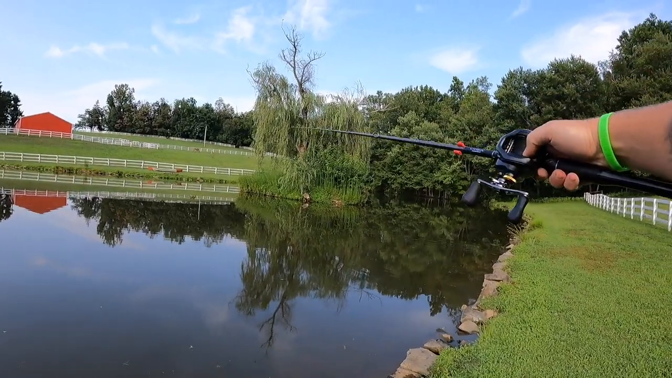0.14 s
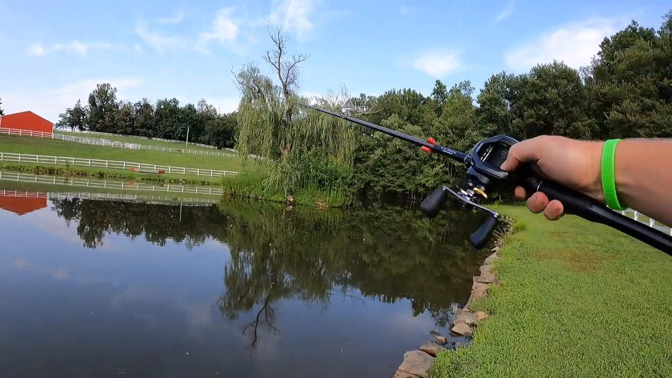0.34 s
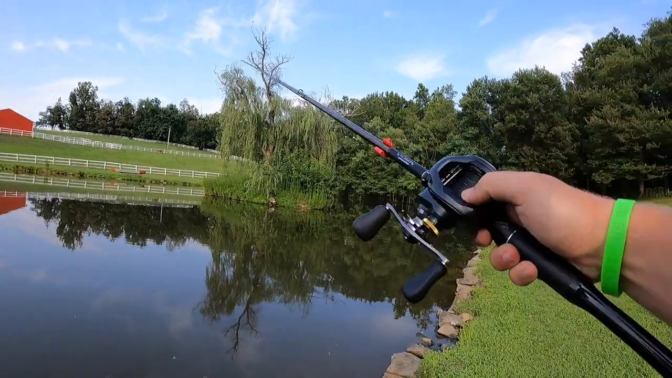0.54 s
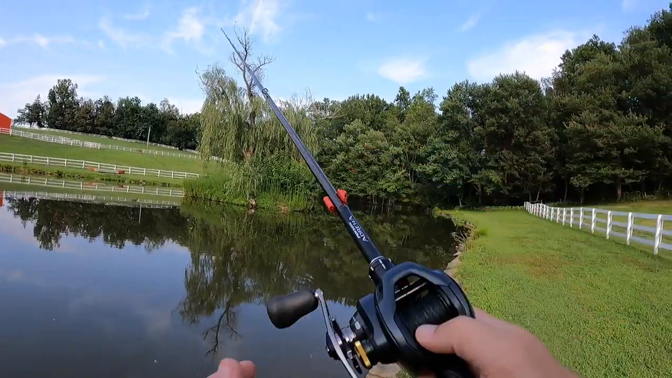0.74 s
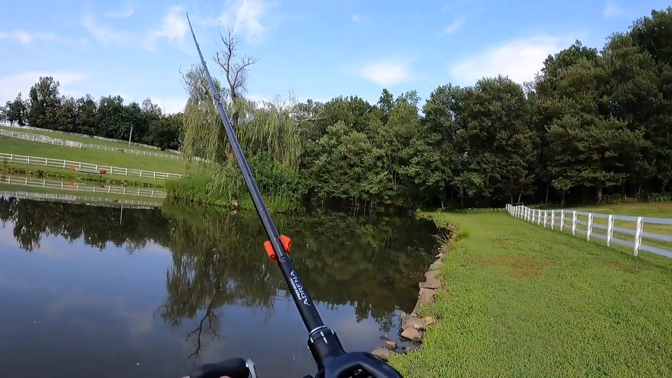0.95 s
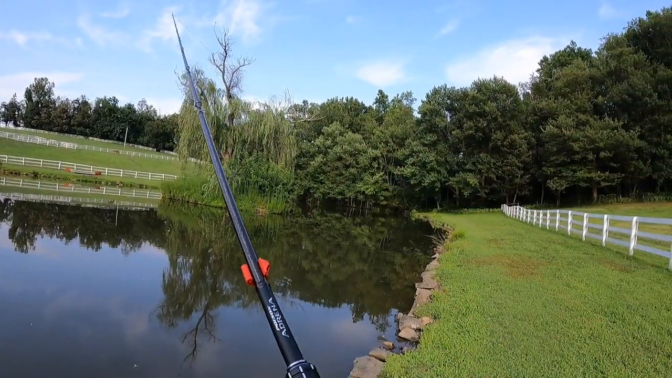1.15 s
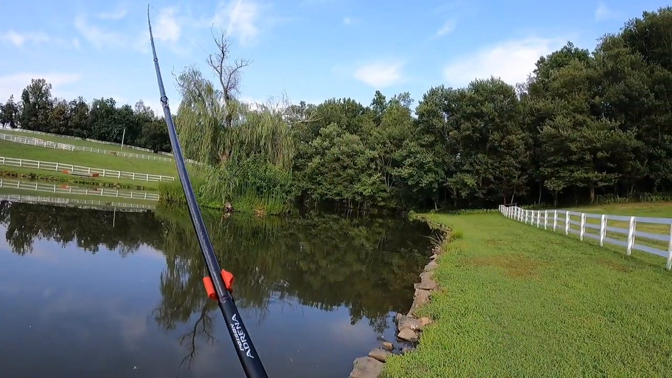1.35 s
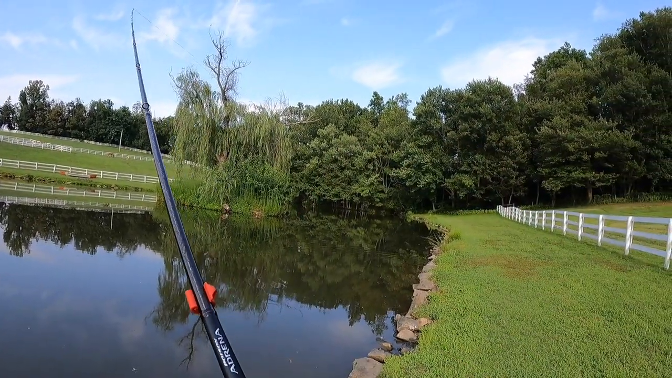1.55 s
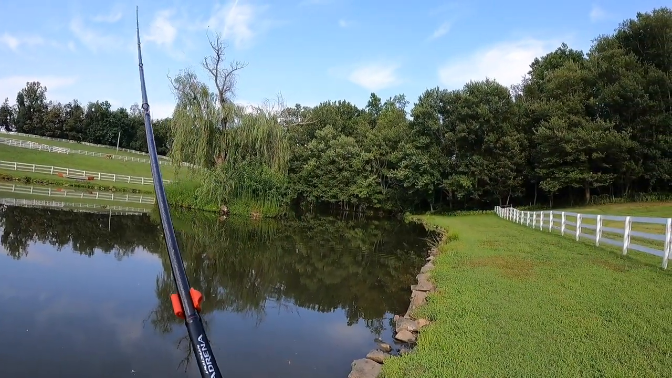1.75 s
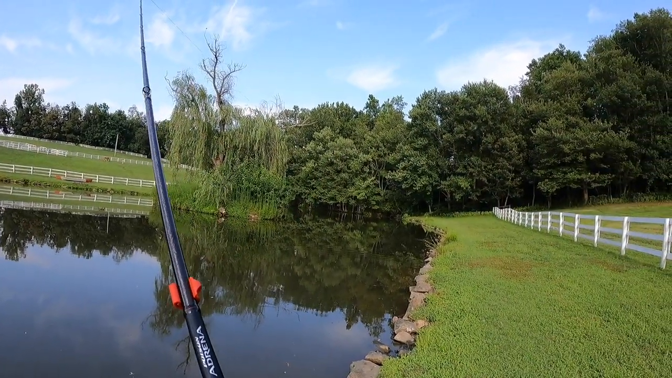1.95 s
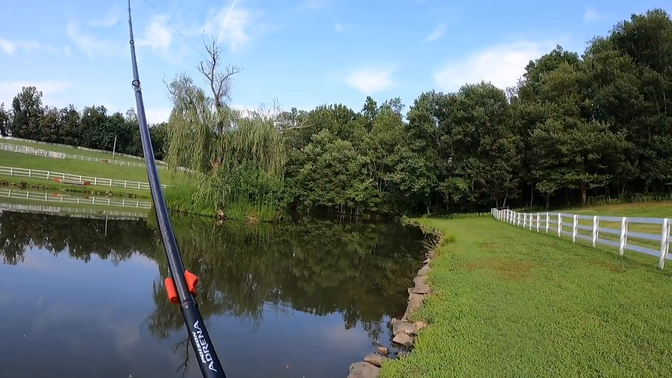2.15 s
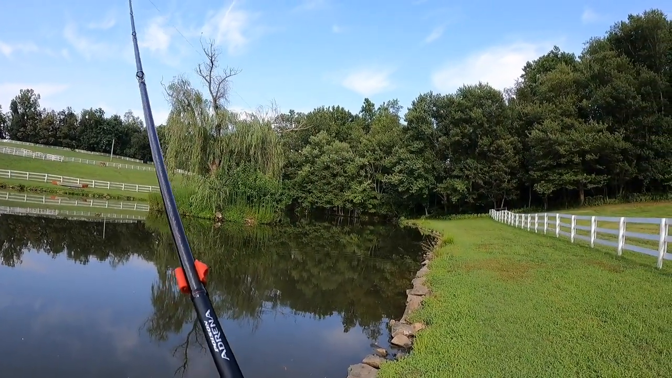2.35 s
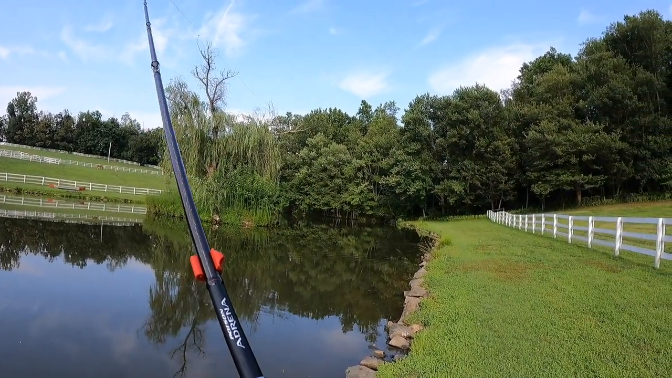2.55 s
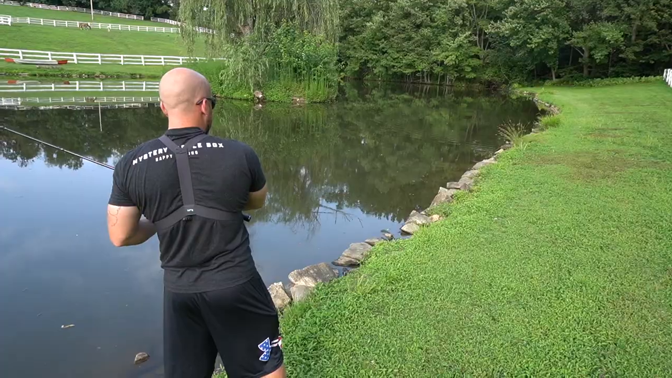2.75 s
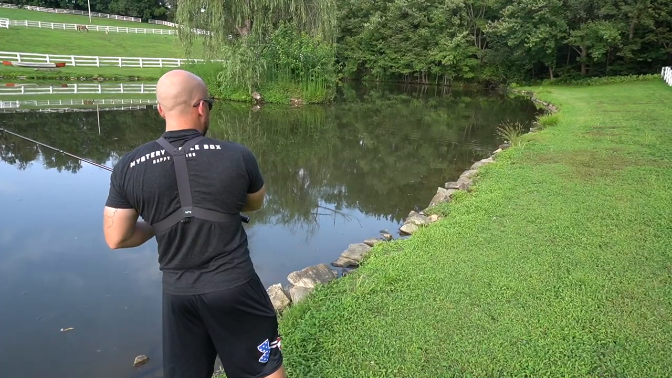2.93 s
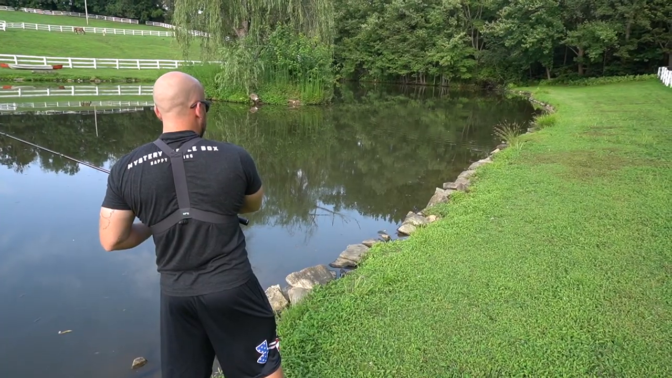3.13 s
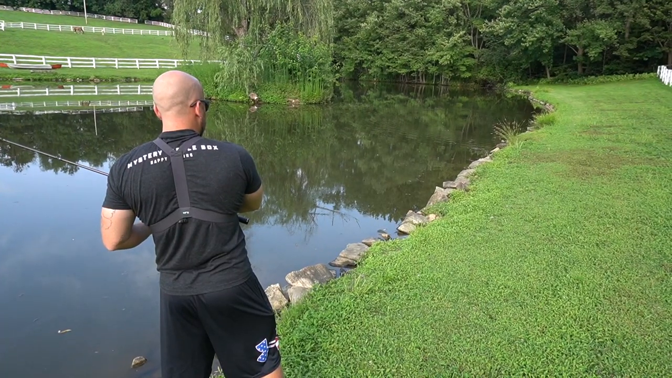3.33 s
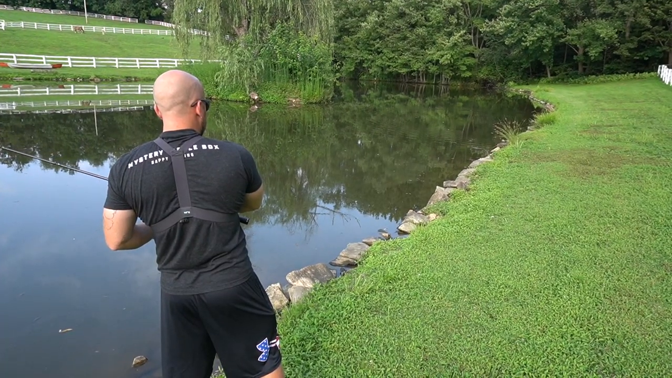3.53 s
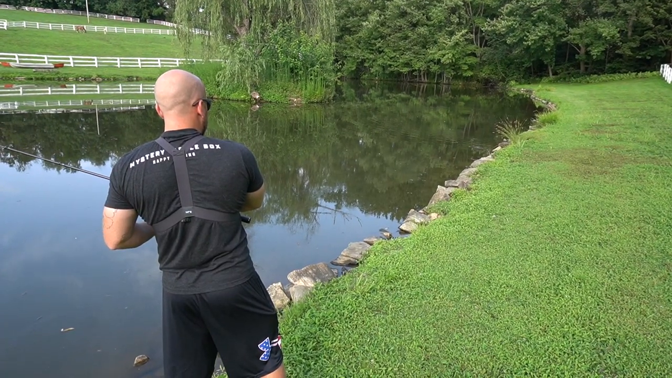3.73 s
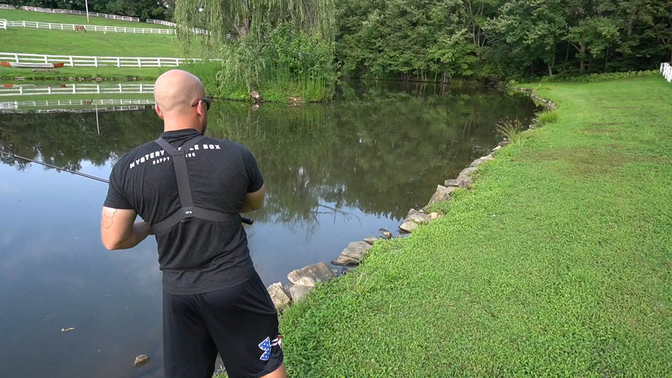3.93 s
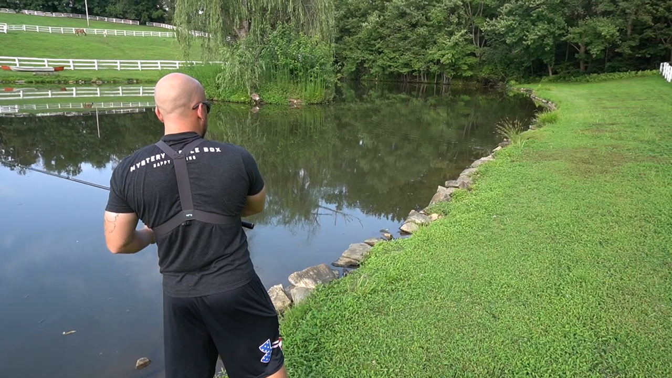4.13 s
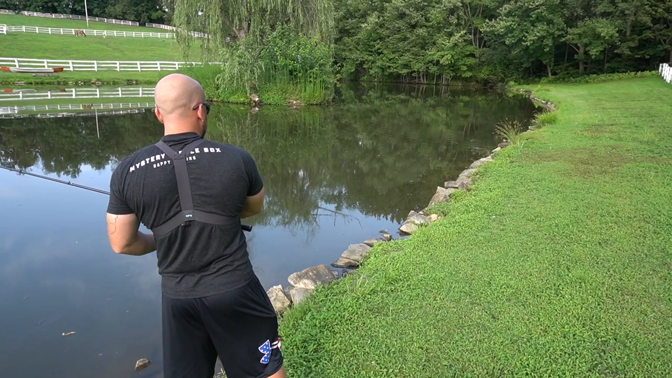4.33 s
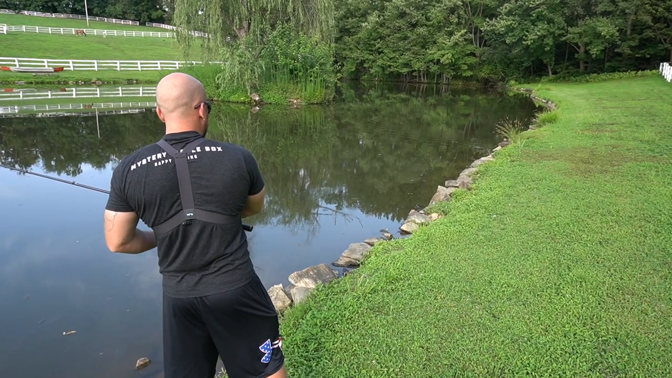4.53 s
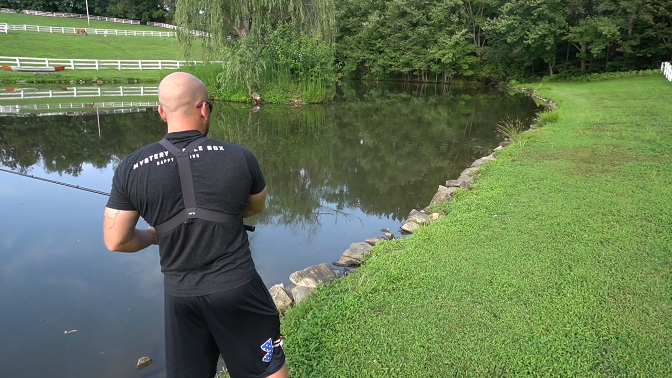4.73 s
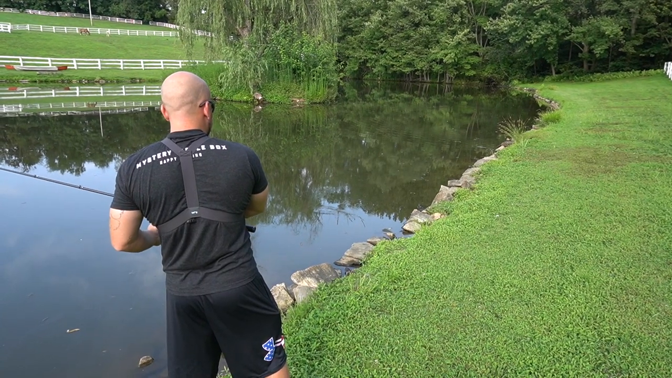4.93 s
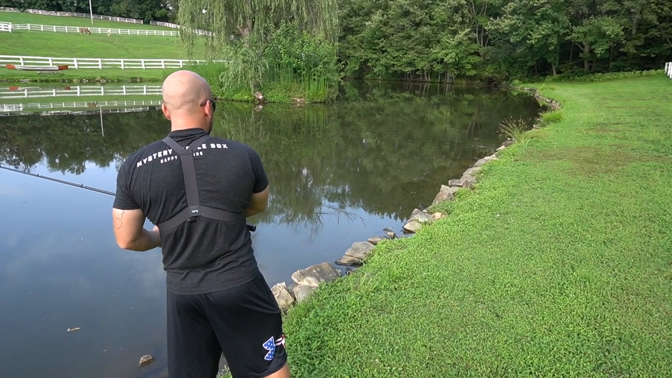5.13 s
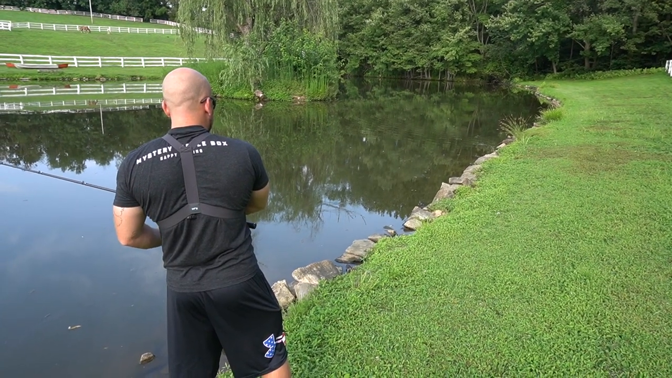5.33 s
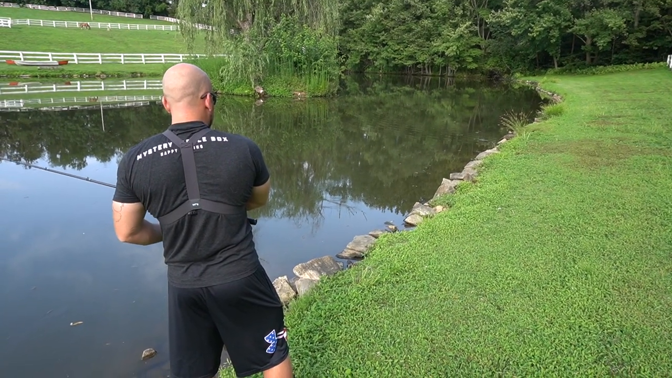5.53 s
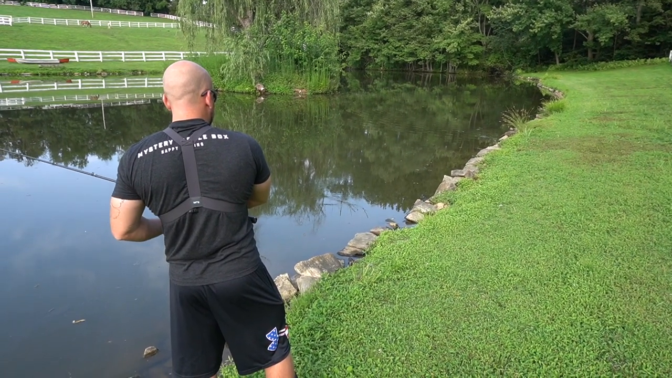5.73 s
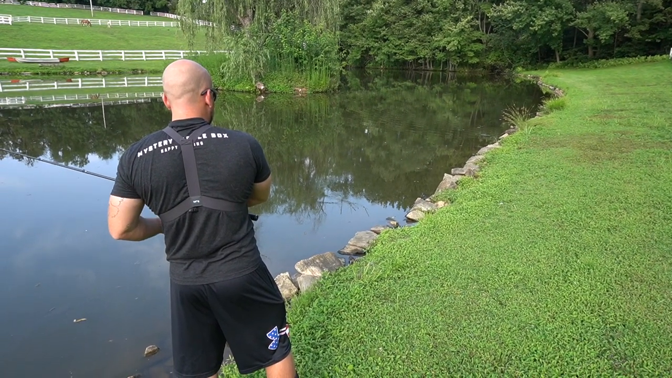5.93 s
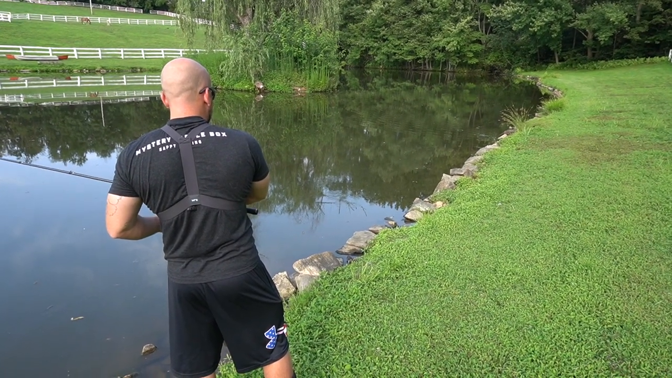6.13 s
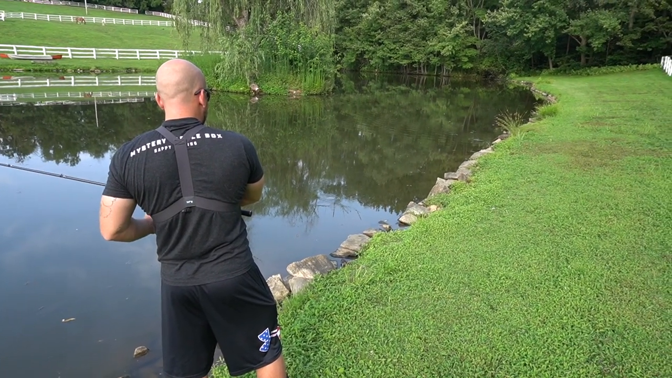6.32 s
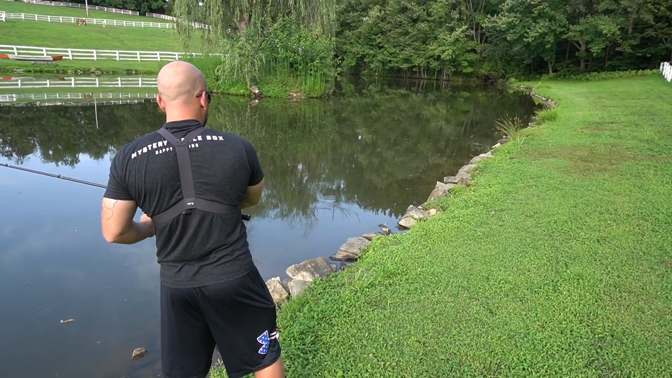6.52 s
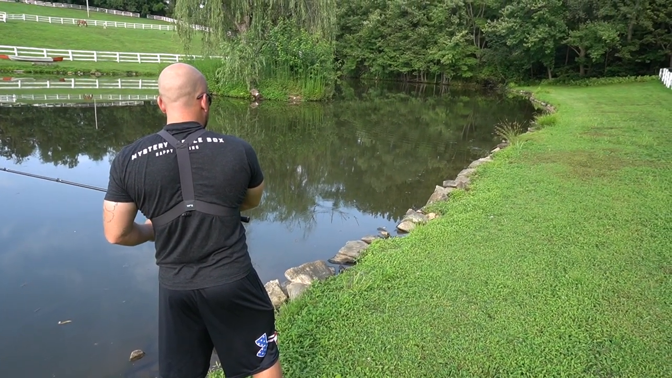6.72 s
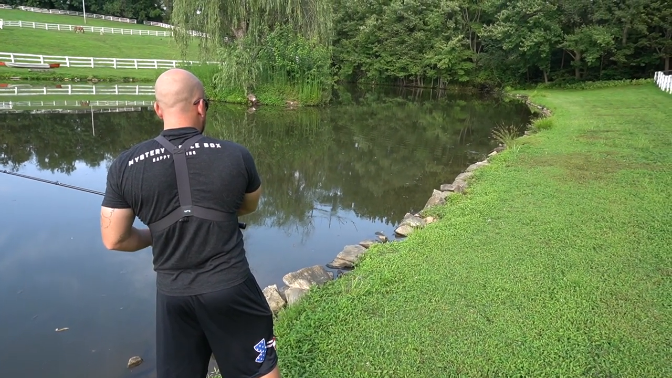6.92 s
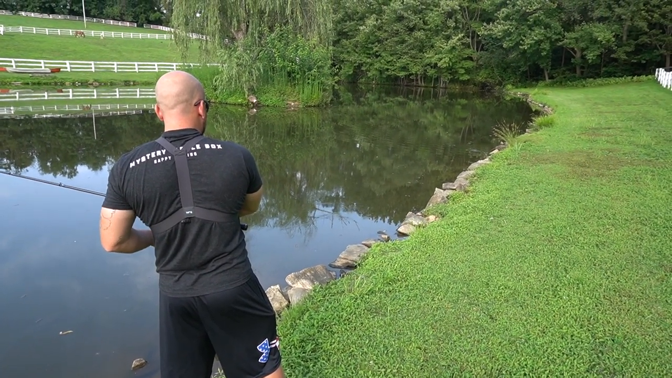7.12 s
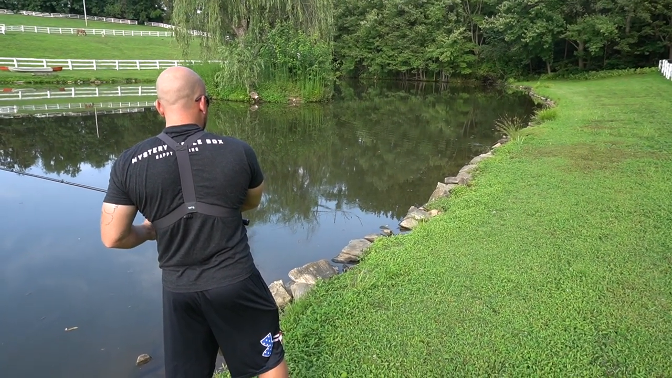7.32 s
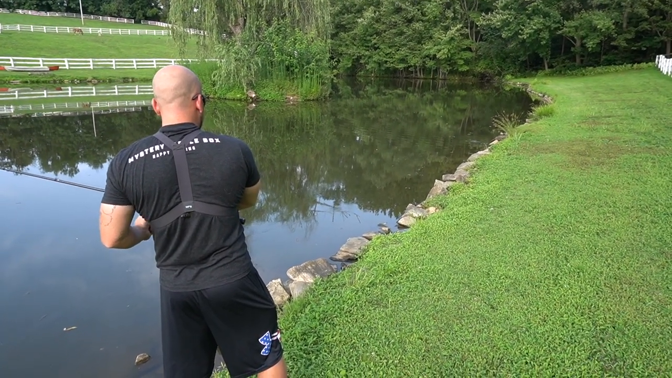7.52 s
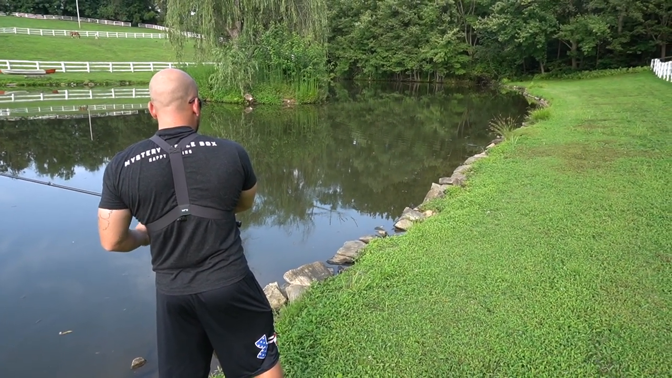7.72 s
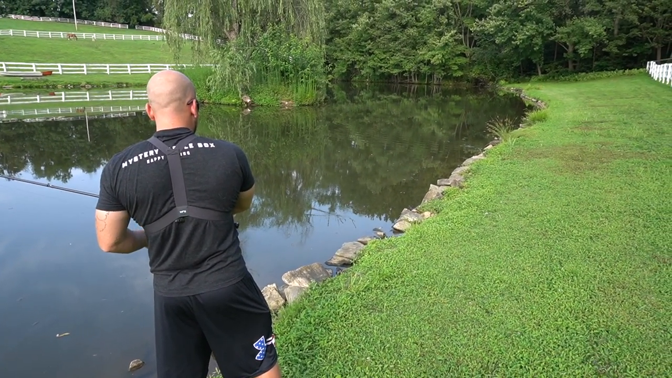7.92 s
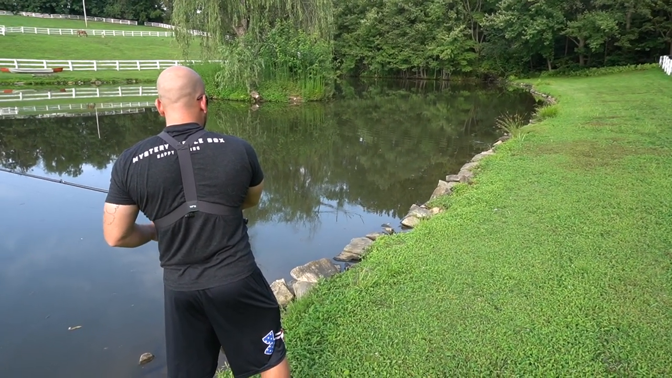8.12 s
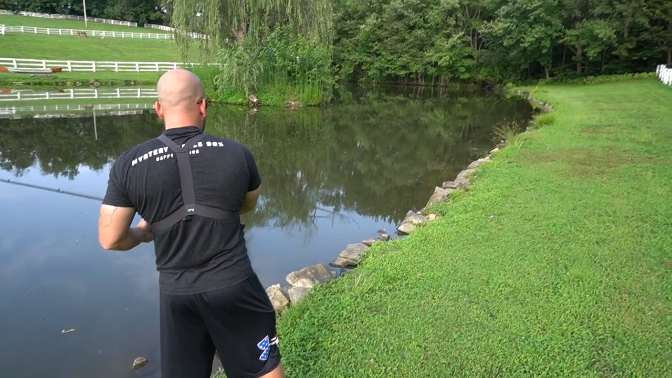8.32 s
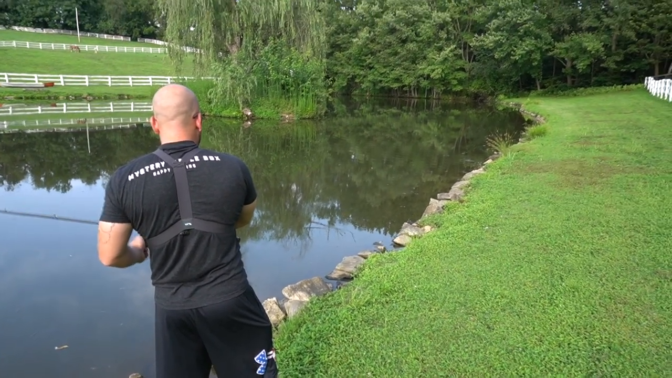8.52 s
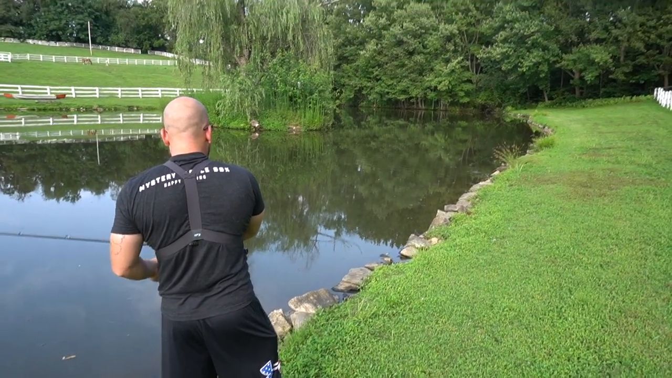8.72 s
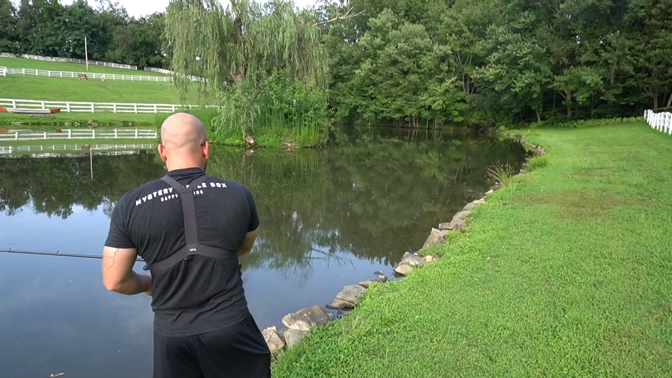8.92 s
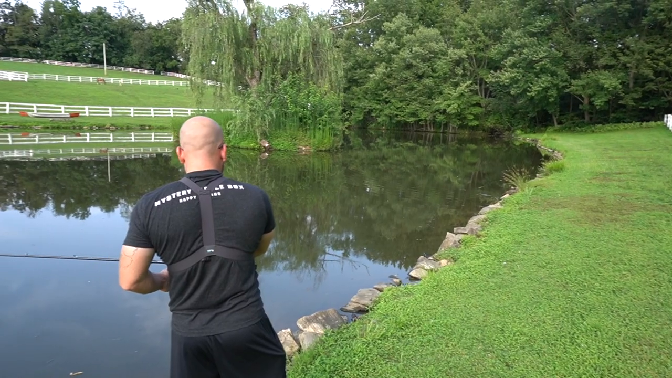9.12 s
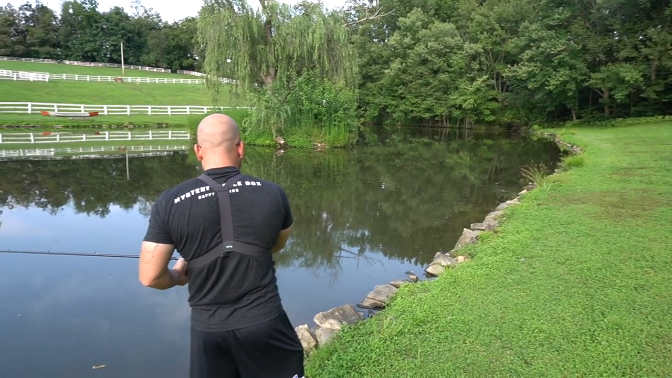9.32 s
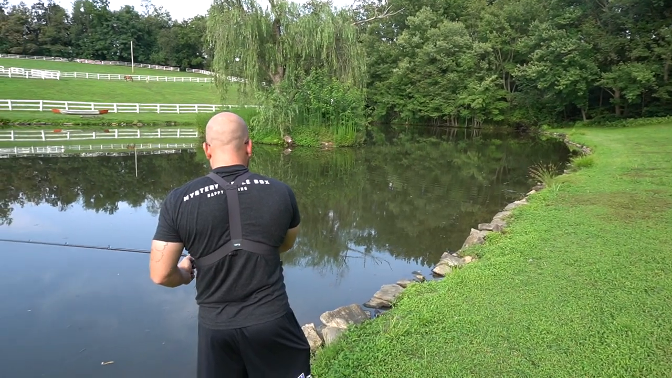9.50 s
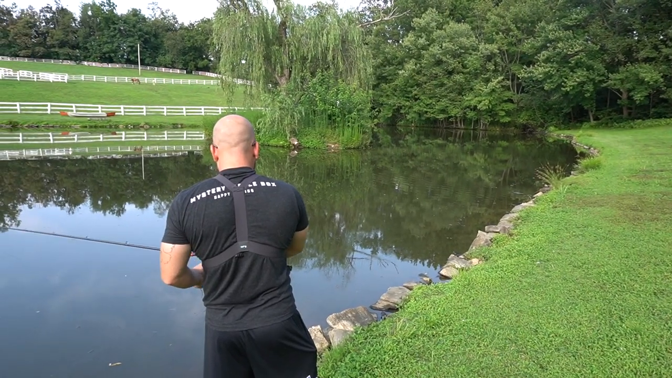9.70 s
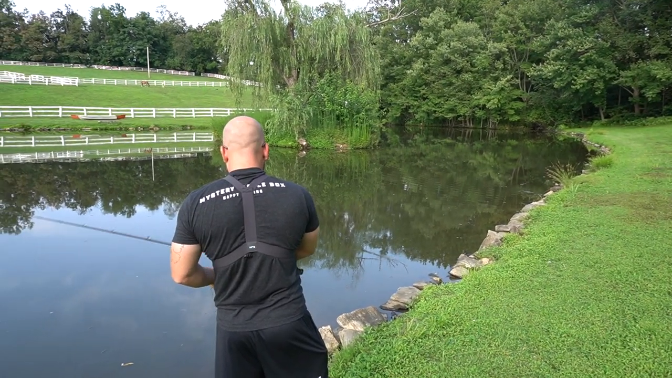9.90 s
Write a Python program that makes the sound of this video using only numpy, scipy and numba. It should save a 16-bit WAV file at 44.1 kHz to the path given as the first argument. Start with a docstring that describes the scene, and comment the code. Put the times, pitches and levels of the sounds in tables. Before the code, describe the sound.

From 0 s, a close reel releases line in a bright hiss with dense patter, and the rod makes a low swish around 0.3 s. From 0.27 s the thumbed spool sings a rough, chattering whistle, slightly right, tumbling from high to low and cutting off near 0.6 s. Distant hoarse caws echo at about 0.45, 0.9 and 1.45 s. A faint tick at 1.0 s and small clicks at 1.3 s precede a very loud, dry gear snap at 1.37 s, with a brief metallic ring; a tiny tick follows at 1.73 s. A nasal bird calls at 2.1 s. Wide rumbling air switches at 2.7 s to calmer, centred air. Until about 10 s, katydids chirp several times a second over fine cricket pulses, faint songbirds whistle from the trees, and a far engine hums. Cloth rustles softly from 9 to 9.7 s.

```python
"""A baitcasting reel beside a pond: from 0 s line noise hisses and patters, the rod swishes (filtered noise),
and from 0.27 s the thumbed spool whistles down as resonant noise; noise cracks and decaying modes snap it into gear.
Crow caws (wandering tone), a nasal call (harmonics), then songbirds (gliding sines) echo from the trees; throughout,
insects buzz as pulsed noise and tones, and a far engine hums in harmonics. At 2.7 s the coloured-noise air passes
from rumbling and wide, as at the angler's chest, to calm and central, as a few steps behind; at 9 s cloth rustles."""
import sys
import numpy as np
from scipy import signal
from scipy.fft import rfft, irfft, next_fast_len
from scipy.io import wavfile
from scipy.ndimage import uniform_filter1d, minimum_filter1d
from numba import njit

SR = 44100
rng = np.random.default_rng(int(sys.argv[2]) if len(sys.argv) > 2 else 0)


def unload_wav(signal):
    """Save mono or channel-first audio to the path in sys.argv[1] as 16-bit WAV at rate SR, clipped to [-1, 1]."""
    wavfile.write(
        sys.argv[1],
        SR,
        np.round(np.clip(np.atleast_2d(signal).T, -1, 1) * 32767).astype(np.int16),
    )


N = 439236
TIME = np.arange(N) / SR
TOP_HZ = 15700

# Spectrum of the line hiss. Each row: frequency in Hz, relative level in dB.
SPOOL_SPECTRUM = [(290, -46), (500, -8.5), (745, -13.5), (871, -2), (1190, -4), (1450, -10.5), (1750, -5),
                  (3610, -4.5), (5700, -4.5), (7160, 1.5), (12100, -15), (14800, -36)]
# Spool spins up, eases, surges again, dies away. Each row: time in seconds, level in dB before unevenness.
SPOOL_LEVEL_DB = [(0.0, -52), (.06, -47), (.3, -45.5), (.37, -50.5), (.46, -47), (.54, -46.5), (.62, -50.5),
                  (1.2, -73)]
# Pitch of the braked spool. Each row: time in seconds, frequency in Hz.
WHISTLE_PITCH_HZ = [(.3, 4980), (0.414, 4570), (.432, 4180), (.52, 4030), (.561, 2424), (0.587, 1490)]
# Blows of clutch, gears and rod butt. Each row: start in seconds, level in dB before the common trims,
# ring against crack in dB before its trim, crack decay in seconds, low edge of the crack in Hz, high edge in Hz.
BLOWS = [(1.0157, -41, 5, 0.0058, 1500, 5000), (1.274, -20, 2, 0.0007, 1100, 7500),
         (1.311, -18, 3, 0.0008, 350, 7500), (1.35, -28.5, -2.5, 0.0037, 1200, 7000),
         (1.3622, -7, -15, 0.00099, 3300, 10000), (1.367, -15.5, -3, 0.0025, 1200, 5000),
         (1.3705, -13, -9.5, 0.0027, 1000, 12000), (1.3738, 4, -0.5, 0.0013, 300, 12000),
         (1.3747, -1, -11, .0006, 900, 12000), (1.377, -5, -21, 0.0036, 60, 600),
         (1.731, -32, -3, 0.0014, 2800, 7500)]
# Filter on every crack. Each row: frequency in Hz, gain in dB.
CRACK_SPECTRUM = [(150, -0.5), (380, -12), (620, -5), (850, -14.5), (1080, -1), (1750, -14.5), (2400, 0),
                  (3000, -7.5), (3650, -2.5), (4100, -10), (4800, -4), (6600, -1.5), (8700, -5),
                  (15000, -30.5)]
# Modes of reel frame and rod. Each row: frequency in Hz, relative level in dB, 60 dB decay time in seconds.
REEL_MODES = [(79.4, -7.5, 0.083), (179.3, -9, 0.064), (1075, -14.5, 0.053), (1420, -8.5, 0.054),
              (2340, -4, 0.029), (2730, -9.5, 0.029), (3600, -14.5, 0.044), (5300, -3, 0.017),
              (6230, -4.5, 0.014), (7000, -8.5, 0.014)]
# Scuffs within the rustle. Each row: middle in seconds, frequency in Hz, peak level in dB.
SCUFF_TABLE = [(9.075, 4970, -64), (9.118, 4700, -59)]
# Crow calls. Each row: start in seconds, level in dB before the tree echo.
CAW_TABLE = [(0.446, -48.5), (.91, -45.5), (1.455, -48)]
# Harmonics of the nasal call. Each row: multiple of the pitch, level in dB before flutter and tree echo.
MEW_HARMONICS = [(3, -69.5), (4, -73), (5, -74), (6, -71)]
# Songbird notes. Each row: start in seconds, length in seconds, start pitch in Hz, end pitch in Hz,
# level in dB before flutter and tree echo.
BIRD_NOTES = [(2.668, 0.09, 4170, 4150, -64), (2.67, .19, 3900, 3920, -66), (2.972, .035, 2450, 3250, -64),
              (3.09, 0.06, 2750, 3000, -62), (3.196, .048, 3900, 2600, -62), (3.62, .14, 2400, 2080, -63.5),
              (4.052, 0.051, 3900, 3250, -64), (4.07, 0.085, 3130, 3020, -60),
              (4.115, .06, 2850, 2230, -63), (4.351, .04, 4200, 3200, -64), (4.628, 0.128, 3550, 2790, -58),
              (4.75, .11, 2200, 2100, -66), (5.332, .048, 4400, 2600, -63),
              (5.937, 0.033, 4000, 3410, -64.5), (5.99, .04, 3700, 3430, -62.5),
              (6.745, .09, 2650, 2390, -64.5), (6.812, 0.059, 4500, 2400, -61),
              (6.99, .15, 2680, 2150, -64.5), (7.33, .038, 4800, 4750, -67),
              (7.368, 0.064, 3000, 3500, -63), (7.39, 0.055, 4180, 4120, -67), (7.475, .1, 3070, 3060, -60),
              (7.51, 0.075, 3100, 2200, -61.5), (7.592, 0.07, 4300, 2550, -60),
              (8.029, 0.12, 3120, 3100, -61), (8.24, .045, 4100, 3150, -65), (9.375, .058, 4000, 3450, -63)]
# Bouts of twitter deeper in the wood. Each row: middle in seconds, half length in seconds,
# relative level in dB, typical pitch in Hz.
TWITTER_BOUTS = [(2.952, 0.27, -70.5, 3490), (3.45, 0.15, -68, 3200), (3.799, .15, -71, 2410),
                 (4.349, 0.36, -69, 2649), (6.95, .3, -70.5, 2504), (8.048, 0.64, -70, 2548)]
# Chirps of the nearest katydids. Each entry: middle in seconds.
CHIRP_TIMES_S = [.92, 1.08, 1.21, 1.729, 2.06, 2.23, 2.37, 2.52, 2.79, 3.1, 3.25, 3.39, 3.51, 3.78, 4.1,
                 4.4, 4.6, 4.73, 5.05, 5.32, 5.59, 5.91, 6.12, 6.37, 6.55, 6.85, 7.099, 7.36, 7.67, 8.08,
                 8.37, 8.67, 8.95, 9.27, 9.54, 9.85]
# Spells of pulsing crickets. Each row: start in seconds, end in seconds, pitch in Hz,
# level in dB before the tree echo.
CRICKET_SPELLS = [(0, 4.33, 7990, -73), (5.3, 7.68, 7910, -77), (8.85, 9.96, 7880, -78),
                  (4.7, 8.2, 8330, -82), (8.55, 9.96, 8320, -80)]
# Spells in which the engine carries well. Each row: start in seconds, end in seconds,
# level in dB added to its faint lowest line.
ENGINE_SPELLS = [(1.68, 1.8, -44.5), (1.92, 2.66, -50.5), (3.4, 4.45, -64.5), (6.2, 7.5, -67.5)]
# Upper engine lines. Each row: multiple of the firing rate, level in dB before the change near 9 s,
# that change in dB.
ENGINE_HARMONICS = [(2, -77.5, -1.5), (3, -77, 8.5)]
# Spectrum of the air at the chest. Each row: frequency in Hz, relative level in dB.
CHEST_AIR_SPECTRUM = [(12, -50), (20, -4), (124, -5.5), (164, -13), (368, -21), (474, -22.5), (1090, -27),
                      (1340, -22.5), (2170, -30.5), (3590, -37.5), (7120, -34.5), (8500, -37.5),
                      (11000, -78)]
# Spectrum of the air behind the angler. Each row: frequency in Hz, relative level in dB.
BANK_AIR_SPECTRUM = [(15, 1.5), (26, -8), (38, -16), (114, -15.5), (151, -24), (260, -29.5), (645, -26),
                     (1770, -34.5), (3660, -41.5), (8000, -45), (10400, -76)]


def undb(db):
    """Decibels to gain."""
    return 10 ** (np.asarray(db) / 20)


def unit(x):
    """Scale to rms 1."""
    return x / np.sqrt(np.mean(x ** 2) + 1e-24)


def curves(table, t=TIME):
    """The columns of a table, joined by straight lines in time."""
    s, *columns = np.transpose(table)
    return [np.interp(t, s, c) for c in columns]


def noise():
    """White noise."""
    return rng.standard_normal(N)


def walk(rate_hz):
    """Random wandering through knots at the given rate, with a spread near 1."""
    knots = rng.standard_normal(N // 8)
    return 1.214 * np.interp(TIME * rate_hz, np.arange(len(knots)), knots)


def colour(x, points):
    """Causal (minimum-phase) filter through (Hz, dB) points, falling away above the last one."""
    size = next_fast_len(N + SR // 2)
    hz, db = np.transpose(points)
    octave = np.log2(np.maximum(np.fft.rfftfreq(size, 1 / SR), 1))
    gain_db = np.interp(octave, np.log2(hz), db)
    gain_db = gain_db - 20 * np.maximum(octave - np.log2(hz[-1]), 0)
    # Folding the cepstrum gives the minimum phase.
    cepstrum = irfft(np.log(undb(gain_db)), size)
    cepstrum[1:size // 2] *= 2
    cepstrum[size // 2 + 1:] = 0
    return irfft(rfft(x, size) * np.exp(rfft(cepstrum)), size)[:N]


@njit
def resonator(x, hz, width_hz):
    """State-variable band-pass with a moving centre."""
    y = np.empty(len(x))
    band_state, low_state = 0., 0.
    for i in range(len(x)):
        g = np.tan(np.pi * min(hz[i], .45 * SR) / SR)
        k = width_hz / hz[i]
        v = (band_state + g * (x[i] - low_state)) / (1 + g * (g + k))
        band_state = 2 * v - band_state
        low_state = low_state + 2 * g * v
        y[i] = k * v
    return y


def band(hz, width_hz):
    """Noise through two equal resonators in series, rms 1."""
    hz = hz * np.ones(N)
    once = resonator(noise(), hz, float(width_hz))
    return unit(resonator(once, hz, float(width_hz)))


def turns(hz):
    """Running phase in radians."""
    return 2 * np.pi * np.cumsum(hz * np.ones(N)) / SR


def envelope(start_s, attack_s, hold_s, fade_db_per_s, curve=1):
    """Rise to 1, hold, then die away evenly in dB."""
    rise = np.clip((TIME - start_s) / attack_s, 0, 1) ** curve
    return rise * undb(-fade_db_per_s * np.clip(TIME - start_s - attack_s - hold_s, 0, 2))


def hump(middle_s, width_s):
    """A Gaussian swell that peaks at 1."""
    return np.exp(-np.minimum(((TIME - middle_s) / width_s) ** 2, 10 ** 2))


def spells(table, fade_s):
    """Gain of a sound that comes and goes in (start s, end s, dB) spells."""
    total = 0
    for start, end, db in table:
        inside_s = np.minimum(TIME - start, end - TIME)
        total = total + undb(db) * np.clip(.5 + inside_s / fade_s, 0, 1)
    return total


def spread(mid, side):
    """Left and right from mid and side."""
    return np.array([mid + side, mid - side])


def trees(x, t60_s, wet_db, echo_s=0, echo_gain=0):
    """The tree line scatters a decaying noise tail, and maybe a smeared echo, back across the water."""
    t = TIME[:2 * SR]
    tail = undb(-60 * t / t60_s) + echo_gain * np.exp(-((t - echo_s) / 0.009) ** 2)
    response = tail * rng.standard_normal(len(t))
    response = response / np.linalg.norm(response)
    return x + undb(wet_db) * signal.fftconvolve(x, response)[:N]


def spool(grain_db=1.5, side_db=-7, uneven_db=1.2, coast_db=-67.5):
    """Line rushes through the guides, then peels off as a dense patter that dies away with the speed."""
    rush_peak_s, rush_fade_db_per_s, rush_db = 0.082, 74, -43.5
    rush_start_hz, rush_sag_hz_per_s, rush_width_hz = 7750, 8600, 1200
    level_db, = curves(SPOOL_LEVEL_DB)
    hiss_gain = np.hypot(undb(level_db + uneven_db * walk(45)), undb(coast_db))
    patter = unit(undb(grain_db * walk(1300)))
    mid, side = (unit(colour(noise() * patter, SPOOL_SPECTRUM)) for _ in range(2))
    hiss = spread(mid, undb(side_db) * side) * hiss_gain
    # The rush sinks no lower than the first whistle pitch.
    rush_hz = np.maximum(rush_start_hz - rush_sag_hz_per_s * TIME, WHISTLE_PITCH_HZ[0][1])
    rush_gain = undb(rush_db) * envelope(0, rush_peak_s, 0, rush_fade_db_per_s, curve=1.2)
    rush = band(rush_hz, rush_width_hz) * patter * rush_gain
    running = np.interp(TIME, [.8, 1.4], [1, 0])
    return (hiss + spread(rush, 0.46 * rush)) * running


def whistle(width_hz=400, double_db=-11, half_db=-52, sizzle_db=-55, chatter=0.23, cycles_per_turn=5.8):
    """The slowing spool, off to the right, sings a rough falling note that chatters once a turn."""
    thumb_s, press_s, hold_s, fade_db_per_s, level_db = 0.271, 0.211, 0.09, 800, -39
    grab_s, grab_width_s, grab_db = .562, 0.0074, 9.5
    pan_db, lag_s = -6, .00005  # left ear against right
    hz, = curves(WHISTLE_PITCH_HZ)
    pressure = envelope(thumb_s, press_s, hold_s, fade_db_per_s, curve=1.85)
    loudness = pressure * undb(level_db + grab_db * hump(grab_s, grab_width_s))
    core = band(hz, width_hz)
    core = unit(core / np.abs(signal.hilbert(core)) ** .5)  # friction holds the swing fairly even
    upper = undb(double_db) * (hz / 4200) ** 2 * band(2 * hz, 1500)  # fades as the spool slows
    # A light touch already sounds an octave below and above.
    octaves = undb(half_db) * band(hz / 2, 230) + undb(sizzle_db) * band(2 * hz, 1100)
    touch = np.sqrt(pressure) * octaves
    once_a_turn = 1 + chatter * np.sin(turns(hz / cycles_per_turn))
    tone = ((core + upper) * loudness + touch) * once_a_turn
    left = undb(pan_db / 2) * np.roll(tone, int(lag_s * SR))
    return np.array([left, undb(-pan_db / 2) * tone])


def crack(t, decay_s):
    """A hard contact: a brief burst with its energy spread evenly over all pitches."""
    fade = np.exp(-t / decay_s)
    spectrum = rfft(fade * rng.standard_normal(len(t)))
    burst = irfft(spectrum / np.abs(spectrum), len(t)) * np.sqrt(np.sqrt(fade))
    return burst * np.linalg.norm(fade) / np.linalg.norm(burst)


def clutch(ring_db=-20, crack_db=3, side_db=-4, shudder_db=-26, shudder_s=.0065):
    """Pawl ticks, then the pinion slams home: each blow cracks, shudders briefly and rings the frame."""
    t = TIME[:SR // 5]
    cracks, blows = np.zeros((2, N)), np.zeros(N)
    for s, db, body_db, decay_s, low_hz, high_hz in BLOWS:
        i = int(s * SR)
        # Small parts radiate no bass, soft contacts no treble.
        edges_hz = [low_hz, min(high_hz, TOP_HZ)]
        thin = signal.butter(2, edges_hz, "bandpass", fs=SR, output="sos")
        bursts = [crack(t, decay_s) + undb(shudder_db) * crack(t, shudder_s) for _ in range(2)]
        cracks[:, i:i + len(t)] += undb(db + crack_db) * signal.sosfilt(thin, bursts)
        blows[i] += undb(db + body_db + ring_db)
    ring = np.zeros(len(t))
    for k, (hz, db, t60_s) in enumerate(REEL_MODES):
        ring += (-1) ** k * undb(db - 60 * t / t60_s) * np.sin(2 * np.pi * hz * t)
    mid = colour(cracks[0], CRACK_SPECTRUM) + signal.fftconvolve(blows, ring)[:N]
    # The middle treble differs most between the ears.
    side_points = [(1200, side_db - 5.5), (4500, side_db - 2.0), (9000, side_db - 8)]
    side = colour(colour(cracks[1], CRACK_SPECTRUM), side_points)
    return spread(mid, side)


def swing(middle_s=0.29, width_s=0.073, hz=300, peak_db=-46.5):
    """The rod sweeps through the air with a low swish of band noise, different at each ear."""
    return np.array([band(hz, 180), band(hz, 140)]) * undb(peak_db) * hump(middle_s, width_s)


def rustle(uneven_db=1.4, scuff_bandwidth_hz=1400, scuff_width_s=0.01):
    """Sleeve and line rub as the rod is lowered: soft grainy noise bands with sharper scuffs."""
    start_s, attack_s, hold_s, fade_db_per_s, level_db = 8.98, 0.07, 0.6, 130, -65.2
    grains = sum(band(hz, 1700) * undb(2 * walk(100)) for hz in (2700, 4100, 5300))
    grains = unit(grains * undb(uneven_db * walk(35)))
    out = grains * undb(level_db) * envelope(start_s, attack_s, hold_s, fade_db_per_s)
    for s, hz, db in SCUFF_TABLE:
        out = out + band(hz, scuff_bandwidth_hz) * undb(db) * hump(s, scuff_width_s)
    return out


def crow(hoarse_hz=55, rasp=0.17):
    """Far hoarse caws; only the strongest throat resonance, arching up and back, carries over the pond."""
    attack_s, hold_s, fade_db_per_s = 0.03, 0.052, 220
    base_hz, arch_hz, arch_top_s, arch_width_s = 1165, 189.6, .06, 0.041
    out = np.zeros(N)
    for s, level_db in CAW_TABLE:
        hz = base_hz + arch_hz * hump(s + arch_top_s, arch_width_s)
        voice = np.sin(turns(hz + hoarse_hz * walk(400))) * (1 + rasp * walk(160))
        out += unit(voice) * undb(level_db) * envelope(s, attack_s, hold_s, fade_db_per_s)
    return trees(out, t60_s=1.5, wet_db=-3.0, echo_s=0.139, echo_gain=0.77)


def mew(start_s=2.06, length_s=.24, pitch_hz=905, arch_hz=45, sag_hz_per_s=200, waver=.013):
    """One nasal bird call: a stack of harmonics that arches and falls."""
    middle_s = start_s + length_s / 2
    arch = arch_hz * hump(start_s + length_s / 3, length_s / 3)
    hz = pitch_hz + arch - sag_hz_per_s * np.clip(TIME - middle_s, 0, length_s)
    phase = turns(hz * (1 + waver * walk(200)))
    voice = sum(undb(db) * np.sin(k * phase) * undb(2 * walk(39.8)) for k, db in MEW_HARMONICS)
    return trees(voice * hump(middle_s, length_s / 2), t60_s=1.3, wet_db=-1)


def slur(length_s, start_hz, end_hz, waver, hook=.05, flutter_db=2.5):
    """One gliding bird note, unsteady in pitch and strength; rising notes bow upward on the way."""
    u = np.linspace(0, 1, int(length_s * SR))
    knots = np.arange(100)
    wobble, flutter = (np.interp(u * length_s * 200, knots, rng.standard_normal(100)) for _ in range(2))
    bow = hook * (end_hz > start_hz) * np.sin(np.pi * u)
    hz = start_hz * (end_hz / start_hz) ** u * (1 + waver * wobble + bow)
    loudness = np.sin(np.pi * u) * undb(flutter_db * flutter)
    return loudness * np.sin(2 * np.pi * np.cumsum(hz) / SR)


def songbirds(waver=.02, lull_db=-79, lull_hz=2750, count=700):
    """Slurred whistles from the trees over a dense twitter of random slurs from further back."""
    near, far = np.zeros(N), np.zeros(N + SR)
    for s, length_s, start_hz, end_hz, db in BIRD_NOTES:
        note = slur(length_s, start_hz, end_hz, waver)
        near[int(s * SR):][:len(note)] += undb(db) * note
    bouts = [(undb(db) * hump(s, half_s), hz) for s, half_s, db, hz in TWITTER_BOUTS]
    bouts.append((undb(lull_db), lull_hz))
    power = sum(gain ** 2 for gain, _ in bouts)
    hz = sum(gain ** 2 * pitch_hz for gain, pitch_hz in bouts) / power  # loud bouts dominate the pitch
    for k, (late, pitch, glide) in enumerate(rng.random((count, 3))):
        i = int((k + late) / count * (N - 1))
        start_hz = hz[i] * 1.6 ** (pitch - .5)
        note = slur(0.045, start_hz, start_hz * (1.08 - 0.37 * glide), waver)
        far[i:i + len(note)] += note
    far = unit(far[:N]) * np.sqrt(power)
    return trees(near, t60_s=2.7, wet_db=-0.5) + trees(far / 2, t60_s=0.9, wet_db=7.0)


def katydid(hz, width_hz):
    """Wing strokes, about a hundred a second, buzz in a narrow resonance."""
    strokes = 1 + .45 * np.sin(turns(107 * (1 + .06 * walk(20))))
    return unit(band(hz, width_hz) * strokes)


def crickets(pulse_hz=19.2, slide_hz=400):
    """Clean, evenly repeated pulses that each slide down in pitch."""
    out = np.zeros(N)
    for start, end, hz, db in CRICKET_SPELLS:
        cycle = turns(pulse_hz * (1 + 0.01 * walk(2))) / (2 * np.pi) % 1
        tone = np.sin(turns(hz - slide_hz * (cycle - .5) + 40 * walk(300)))
        pulses = tone * np.sin(np.pi * cycle) ** 6
        out += unit(pulses) * spells([(start, end, db)], fade_s=0.079)
    return trees(out, t60_s=0.3, wet_db=-7)


def insects(chirp_db=-58.2, chirp_width_s=.046):
    """Katydids chirp over a blurred chorus of their kind, with crickets and a steady far trill."""
    trill = undb(-77.0) * np.sin(turns(7280 + 45 * walk(500))) * np.sqrt(2)
    chirps = sum(hump(s, chirp_width_s) for s in CHIRP_TIMES_S)
    near = katydid(9183, 530) * undb(chirp_db + walk(1.92)) * chirps
    chorus = katydid(9250, 1300) * undb(-67.5 + 2.5 * walk(13))
    low_pass = signal.butter(8, 10300, fs=SR, output="sos")
    return signal.sosfilt(low_pass, crickets() + trill + near + chorus)


def engine(firing_hz=123, faint_db=-74, fade_db=2, whine_hz=1095, whine_db=-75):
    """Firing harmonics, faded by moving air; the third and a faint whine swell once, near 9 s."""
    swell_s, swell_width_s, whine_swell_db = 9.05, 0.26, 7
    phase = turns(firing_hz * (1 + 0.00973 * walk(5.5)))
    low = unit(np.sin(phase) * undb(fade_db * walk(13)))
    low = low * (undb(faint_db) + spells(ENGINE_SPELLS, fade_s=0.099))
    swell = hump(swell_s, swell_width_s)
    upper = np.zeros(N)
    for k, db, change_db in ENGINE_HARMONICS:  # the second harmonic dips slightly
        line = unit(np.sin(k * phase) * undb(fade_db * walk(4.5)))
        upper += line * undb(db + change_db * swell)
    whine = undb(whine_db + whine_swell_db * swell) * band(whine_hz, 119.2)
    return low + upper + whine


def high_hiss(middle_s=2.92, width_s=0.55, hz=5000, width_hz=2600, peak_db=-73):
    """A soft high hiss around 5 kHz swells and fades near 2.9 s: noise in a broad resonance."""
    return band(hz, width_hz) * undb(peak_db) * hump(middle_s, width_s)


def air(chest_db=-46, settle_db_per_s=2.2, rumble_db=-54, bank_db=-51.5, hiss_db=-80):
    """Coloured noise: rumbling, wide and settling after the cast, then calm and central, over thin hiss."""
    chest_bass_side_db, chest_side_db = -15, -6
    step_back_s, step_fade_s = 2.675, 0.012
    mid, side = (unit(colour(noise(), CHEST_AIR_SPECTRUM)) for _ in range(2))
    # The bass reaches both ears alike.
    side = colour(side, [(110, chest_bass_side_db), (400, chest_side_db), (9000, chest_side_db)])
    chest = spread(mid, side) * undb(chest_db - settle_db_per_s * TIME)
    chest = chest + undb(rumble_db) * band(82, 70)
    bank = unit(colour(noise(), BANK_AIR_SPECTRUM)) * undb(bank_db + .5 * walk(2.7))
    behind = np.clip((TIME - step_back_s) / step_fade_s, 0, 1)
    return chest * (1 - behind) + bank * behind + undb(hiss_db) * noise()


def scene():
    """The reel close by, with the life of the pond around it."""
    angler = spool() + whistle() + clutch() + swing() + rustle()
    return angler + crow() + mew() + songbirds() + insects() + engine() + high_hiss() + air()


def record(dry):
    """A limiter ducks peaks above its ceiling and holds for a moment; a steep low-pass cuts the top."""
    ceiling, hold_samples, attack_samples = .87, SR // 16, 20
    needed = np.minimum(1, ceiling / (np.abs(dry).max(axis=0) + 1e-9))
    held = minimum_filter1d(needed, hold_samples, origin=(hold_samples - attack_samples) // 2)
    gain = uniform_filter1d(held, attack_samples)
    low_pass = signal.ellip(8, .2, 70, TOP_HZ, fs=SR, output="sos")
    return signal.sosfilt(low_pass, dry * gain)


dry = scene()
out = record(dry)
unload_wav(out)
```